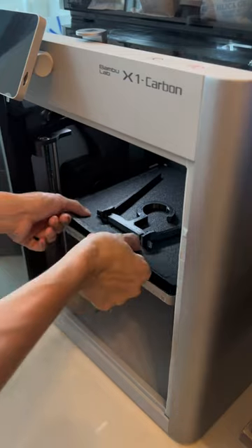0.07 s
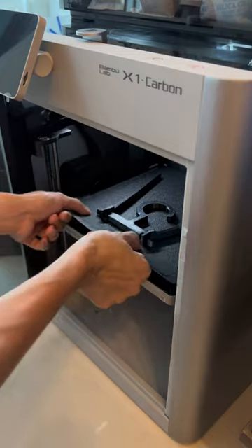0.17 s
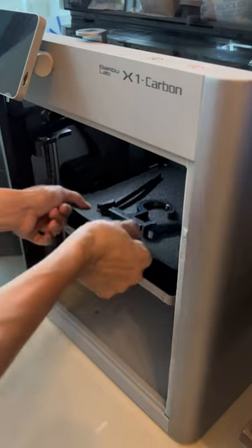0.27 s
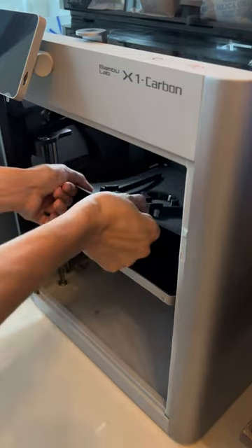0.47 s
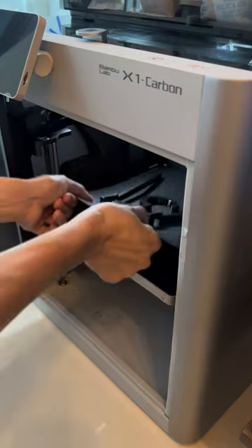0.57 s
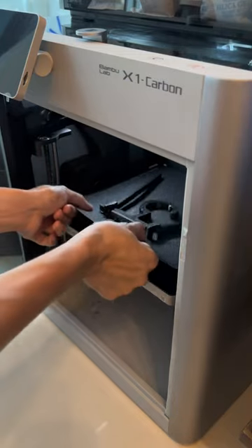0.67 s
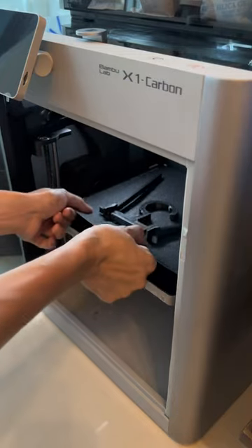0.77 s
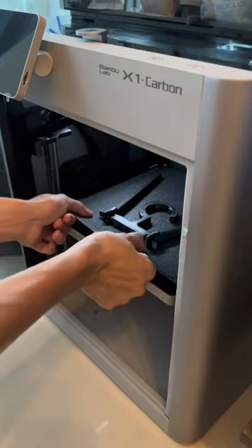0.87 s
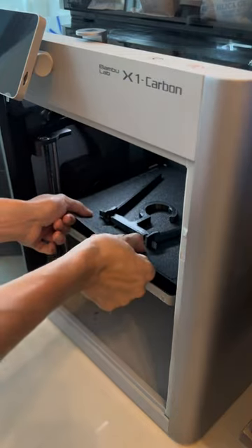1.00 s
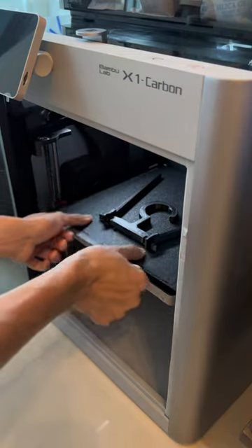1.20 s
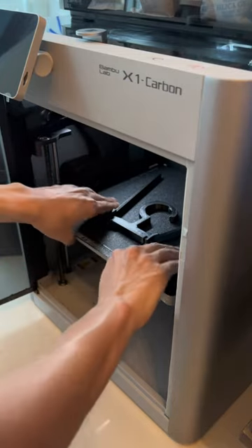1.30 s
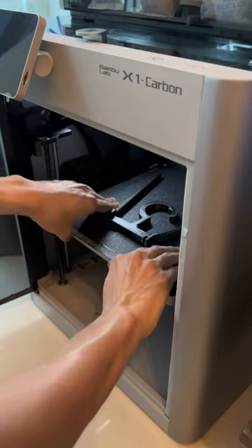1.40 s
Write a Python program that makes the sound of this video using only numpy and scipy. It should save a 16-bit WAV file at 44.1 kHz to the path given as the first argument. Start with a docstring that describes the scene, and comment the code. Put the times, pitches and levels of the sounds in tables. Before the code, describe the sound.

Sharp metallic clicks come from a steel plate being pulled loose and laid back in a machine cabinet: a ringing snap, a knock, a clack, faint scraping and a final click. The microphone is close, in a small hard room.

```python
"""Inside a machine cabinet in a small hard room, two hands work a spring-steel plate off its magnetic
bed and lay it back. The plate ticks, snaps free, knocks the frame, clacks down, then slides and clicks
home. Each contact is a burst of tiny impacts that makes the steel ring and the cabinet boom; sliding
makes a grainy hiss. The room echoes over air noise, hum and handling rumble. Heard by a phone close by.
"""
import sys
import numpy as np
from scipy import signal
from scipy.fft import rfft, irfft, next_fast_len
from scipy.io import wavfile
from scipy.ndimage import uniform_filter1d

SR = 44100
rng = np.random.default_rng(int(sys.argv[2]) if len(sys.argv) > 2 else 0)


def inscribe(sig):
    """Save sig as 16-bit PCM at rate SR to the path in sys.argv[1].

    A 1-D sig is mono; a 2-D sig holds one channel per row.
    Samples are clipped to [-1, 1] before scaling.
    """
    pcm = np.round(np.clip(np.atleast_2d(sig).T, -1, 1) * 32767)
    wavfile.write(sys.argv[1], SR, pcm.astype(np.int16))


N = 63945
BANDS = 25 * 2 ** (np.arange(29) / 3)  # pitches in Hz, three to an octave


# The snap. Each row: start in seconds, level in dB, cabinet boom in dB.
SNAPS = [(0.2346, 0, -28.5)]
# The tone of its crack. Each row: pitch in Hz, level in dB in an octave around that pitch.
SNAP_CRACK = [(100, -35), (190, -26), (330, -32), (650, -31.5), (1100, -21.5), (2700, -15.5), (4600, -16),
              (7000, -22.5), (9000, -30), (15500, -23)]
# The freed plate's notes. Each row: pitch in Hz, relative level in dB, seconds to fade by 60 dB.
SNAP_MODES = [(765, 10, .2), (1110, 2, .06), (1414, 0, .08), (1740, -2, .05), (2010, -1, .06),
              (2275, 2, .06), (2660, -1, .05), (2910, 2, .04), (4135, -1, .04), (4643, 3, .04),
              (5210, -2, .035), (5535, -1, .04), (6290, 0, .03), (7650, -1, .03)]

def snap_free():
    """The plate breaks from the magnet's pull and rings."""
    return contacts(SNAPS, SNAP_CRACK, SNAP_MODES,
                    ring_db=3, rise=.00092, hold=.0027, t60=.049, lag=.00258)


# The ticks. Each row: start in seconds, level in dB, cabinet boom in dB.
EDGE_TICKS = [(0.0655, -16.5, -90), (0.1225, 0.5, -68), (0.2349, 8, -75), (0.547, -47, -48.5),
              (0.626, -42, -63), (0.682, -54, -58.5), (0.950, -49, -70), (1.1135, -49, -60),
              (1.160, -25, -48.5), (1.2128, -13.5, -42.5)]
# Their tone. Each row: pitch in Hz, level in dB in an octave.
TICK_CRACK = [(300, -64.5), (1100, -64.5), (2000, -37.5), (3100, -32.5), (4900, -38), (6600, -29),
              (9500, -33.5), (15500, -27.5)]
# The held plate's notes. Each row: pitch in Hz, relative level in dB, fade time in seconds.
TICK_MODES = [(2140, -2, .04), (2930, 0, .04), (3690, -4, .04), (4160, -4, .035), (6280, -1, .025),
              (6700, 2, .03), (8510, -4, .015)]

def edge_ticks():
    """The plate's edge touches down with short, bright ticks."""
    return contacts(EDGE_TICKS, TICK_CRACK, TICK_MODES,
                    ring_db=9, rise=.0005, hold=.001, t60=.042, lag=.00089)


# The knocks. Each row: start in seconds, level in dB, cabinet boom in dB.
KNOCKS = [(0.2495, 3, -42), (0.4890, -1.5, -44.5)]
# Their tone. Each row: pitch in Hz, level in dB in an octave.
KNOCK_CRACK = [(150, -46), (400, -43), (900, -34), (1700, -38), (2400, -46), (4500, -50.5), (9000, -55.5),
               (15500, -66.5)]
# The frame's notes. Each row: pitch in Hz, relative level in dB, fade time in seconds.
FRAME_MODES = [(355, -2, .1), (595, -2, .08), (918, 2, .06), (1125, -4, .07), (1700, -1, .05),
               (1950, -2, .05)]

def frame_knocks():
    """The plate bumps the frame, which answers with lower notes."""
    return contacts(KNOCKS, KNOCK_CRACK, FRAME_MODES,
                    ring_db=6.5, rise=.0007, hold=.0045, t60=.11, lag=.001)


# The clacks. Each row: start in seconds, level in dB, cabinet boom in dB.
CLACKS = [(0.7470, -29, -81), (0.8594, 2.5, -46), (0.8765, -6, -52), (1.1860, -14, -46)]
# Their tone. Each row: pitch in Hz, level in dB in an octave.
CLACK_CRACK = [(200, -54), (700, -59), (1500, -42.5), (2400, -41), (4500, -51), (7000, -48.5),
               (10000, -51.5), (15500, -58)]
# The landing plate's notes. Each row: pitch in Hz, relative level in dB, fade time in seconds.
CLACK_MODES = [(1098, -4, .06), (1530, 3, .06), (2140, 2, .06), (2487, -2, .045), (2875, -2, .045),
               (4380, -1, .035)]

def clack_down():
    """The plate lands on its bed and rings briefly."""
    return contacts(CLACKS, CLACK_CRACK, CLACK_MODES,
                    ring_db=5, rise=.0006, hold=.0036, t60=.023, lag=.002)


# The last click. Each row: start in seconds, level in dB, cabinet boom in dB.
CLICKS = [(1.2234, 0, -61)]
# Its tone. Each row: pitch in Hz, level in dB in an octave.
CLICK_CRACK = [(300, -62), (900, -50), (2400, -37), (4000, -35.5), (6000, -32), (9000, -32.5),
               (12000, -21.5), (15500, -37)]
# The seated plate's notes. Each row: pitch in Hz, relative level in dB, fade time in seconds.
CLICK_MODES = [(900, -3, .012), (1600, 0, .012), (2450, 2, .012), (3500, 1, .014), (4300, -1, .014),
               (5250, 0, .014), (6000, 1, .012)]

def click_home():
    """The plate clicks into place and its notes die almost at once."""
    return contacts(CLICKS, CLICK_CRACK, CLICK_MODES,
                    ring_db=12, rise=.00021, hold=.0042, t60=.0057, lag=.00087)


def contacts(rows, crack, modes, ring_db, rise, hold, t60, lag):
    """Each contact chatters into the plate's natural notes (modes) and shakes the cabinet."""
    ring_s = .6
    out, t = np.zeros((2, N)), np.arange(int(ring_s * SR)) / SR
    f = np.fft.rfftfreq(len(t), 1 / SR)
    plate = plate_response(f, crack, modes, ring_db, lag)
    for start, db, boom_db in rows:
        mid, side = rfft(chatter(t[:8192], rise, hold, t60), len(t)) * plate
        hit = irfft(ports(mid, side, f), len(t)) * (t < ring_s / 2)
        sound = undb(db) * hit + undb(boom_db) * cabinet_boom(t)
        i = int(start * SR)
        out[:, i:i + len(t)] += sound[:, :N - i]
    return out


def chatter(t, rise, hold, t60):
    """A burst of tiny impacts that rises, holds and fades; all three times are in seconds."""
    shape = onset(t, rise) * fade(np.maximum(t - hold, 0), t60)
    burst = rng.standard_normal((2, len(t))) * shape
    for _ in range(8):  # make all pitches equally strong, then restore the shape
        burst = irfft(np.exp(1j * np.angle(rfft(burst))), len(t))
        burst = burst * shape / np.sqrt(abs(uniform_filter1d(burst ** 2, size=90)) + 1e-16)
    return burst / np.sqrt(np.sum(burst ** 2, axis=1, keepdims=True))


def plate_response(f, crack, modes, ring_db, lag):
    """Notes stand out of a dense ring, more so with ring_db; slow bending waves bring the lows later."""
    notes = 1 + sum(undb(db + ring_db) / (1 + 2j * np.pi * (f - hz) * t60 / np.log(1000))
                    for hz, db, t60 in modes)
    nearby_power = uniform_filter1d(uniform_filter1d(abs(notes) ** 2, size=400), size=400)
    per_hz = SR * np.sqrt(.005 / np.log(2) * f ** 3) / (f ** 2 + 70 ** 2)  # also thins the deep bass
    tone = undb(at(crack, f)) * per_hz
    delay_cycles = lag * (2 * np.sqrt(1000 * f) - f / 4)
    return notes / np.sqrt(nearby_power) * tone * np.exp(-2j * np.pi * delay_cycles)


# The cabinet's deep notes. Each row: pitch in Hz, relative level in dB, fade time in seconds.
CABINET_MODES = [(115.25, -15, .9), (158.2, -6.5, 0.9), (187, -0.5, 0.35), (218, -6, 0.37), (235, -9, 1)]

def cabinet_boom(t):
    """The shaken cabinet rings low, each note a little different on the left and right."""
    boom = 0
    for hz, db, t60 in CABINET_MODES:
        phase, side_shift = rng.uniform(0, 2 * np.pi, 2)
        angle = 2 * np.pi * hz * t + phase
        boom = boom + undb(db) * fade(t, t60) * ports(np.sin(angle), np.sin(angle + side_shift), hz)
    return boom * onset(t, rise=.007)


# Rubbing as the plate is lifted, carried and seated. Each row: time in seconds, level in dB.
LIFT_RUB = [(0, -0.5), (0.04, -4.5), (0.05, -7.5), (0.11, -11.5), (0.205, -14.5), (0.222, -2), (0.236, 15)]
CARRY_RUB = [(0.49, -24), (0.515, -14), (0.56, -24), (0.62, -65), (0.87, -33), (0.89, -8), (0.935, -31),
             (0.96, -19.5), (0.99, -63)]
SEAT_RUB = [(1.04, -31.5), (1.109, -15.5), (1.116, -4), (1.15, -2.5), (1.19, -4), (1.222, -5.5)]
# The tone of the rubbing. Each row: pitch in Hz, level in dB in an octave.
LIFT_TONE = [(400, -62), (1200, -65.5), (2100, -49.5), (3500, -49.5), (5000, -53.5), (6500, -51),
             (10000, -56.5), (15500, -52.5)]
SEAT_TONE = [(250, -59.5), (500, -58.5), (1100, -58.5), (2200, -56), (4500, -56.5), (8000, -63.5),
             (15500, -74)]

def sliding():
    """The plate rubs on its way off the bed and back on."""
    return rub(LIFT_RUB, LIFT_TONE) + rub(CARRY_RUB, LIFT_TONE) + rub(SEAT_RUB, SEAT_TONE)


def rub(curve, tone, grains_per_s=2100, rough_db=3):
    """Steel slides on the textured bed: a hiss broken into fine grains."""
    t = np.arange(N) / SR
    when, db = np.array(curve).T
    level = undb(np.interp(t, when, db)) * (t >= when[0]) * (t <= when[-1])
    grains = np.interp(t * grains_per_s, np.arange(N), rng.standard_normal(N))
    rough = undb(rough_db * grains)
    hiss = sum(undb(at(tone, hz)) * noise for hz, noise in band_noises(N, side_db=-2.5) if hz > 200)
    return hiss * rough / np.sqrt(np.mean(rough ** 2)) * level


# How long the echo lasts. Each row: pitch in Hz, seconds to fade by 60 dB.
ECHO_FADE = [(150, .6), (600, .9), (2000, .82), (4000, .76), (8000, .72), (14000, .45)]
# How strong it is. Each row: pitch in Hz, level in dB.
ECHO_LEVEL = [(120, -12.5), (450, -8), (1000, -16), (2500, -13.5), (4500, -16), (8000, -19), (14000, -26.5)]

def room_echo(sound):
    """Hard walls throw back a blur of echoes that dies sooner in the treble."""
    t, echo = np.arange(SR) / SR, 0
    for hz, noise in band_noises(len(t), side_db=0):
        tail = noise * onset(t, rise=.004) * fade(t, at(ECHO_FADE, hz))
        band_share = hz * (2 ** (1 / 6) - 2 ** (-1 / 6)) / (SR / 2)
        energy = np.mean(np.sum(tail ** 2, axis=1))
        echo = echo + tail * undb(at(ECHO_LEVEL, hz)) * np.sqrt(band_share / energy)
    return signal.fftconvolve(sound.mean(axis=0, keepdims=True), echo, axes=1)[:, :N]


# Air noise and rumble. Each row: pitch in Hz, level in dB in an octave.
AIR_TONE = [(22, -57), (40, -67.5), (60, -49.5), (85, -56), (125, -51.5), (220, -62), (400, -69.5),
            (900, -71), (1500, -76), (2200, -72.5), (4000, -85.5), (8000, -91), (15500, -85)]
# The hum. Each row: pitch in Hz, level in dB.
HUM = [(60, -53), (113, -55)]
# How handling swells the bass. Each row: time in seconds, level change in dB.
HANDLING_SWELL = [(0, -4), (0.25, -2.5), (0.38, -0.5), (0.53, 0.5), (0.66, -1.5), (0.8, -6), (0.89, 0.5),
                  (1.0, -1), (1.11, 4.5), (1.2, 1), (1.26, -1), (1.44, -2)]

def background():
    """Steady air noise over a low, humming rumble that swells as the plate is handled."""
    t = np.arange(N) / SR
    swell = undb(np.interp(t, *np.array(HANDLING_SWELL).T))
    hum = sum(undb(db) * np.sqrt(2) * np.sin(2 * np.pi * (hz * t + rng.random())) for hz, db in HUM)
    air = sum(undb(at(AIR_TONE, hz)) * noise * (swell if hz < 150 else 1)
              for hz, noise in band_noises(N, side_db=0))
    return hum * swell + air


# Scattered sound that the two microphone openings do not share. Each row: pitch in Hz, level in dB.
UNSHARED = [(60, -25), (200, -18), (450, -5), (900, 1), (1350, -2), (1900, -9), (2800, 0), (4600, 0),
            (6500, -6), (9000, -12), (12000, -20), (15000, -12)]

def ports(mid, side, hz, side_db=-7.5):
    """Left and right from a shared (mid) and an unshared (side) part; the default suits direct sound."""
    width = undb(at(UNSHARED, hz) + side_db)
    return (mid + width * side * np.array([[1], [-1]])) / np.sqrt(1 + width * width)


def band_noises(size, side_db):
    """Stereo noise in slices a third of an octave wide, each with a power of one third."""
    n = next_fast_len(size)
    f = np.arange(n // 2 + 1) * SR / n
    white = rfft(rng.standard_normal((2, n)))
    for hz in BANDS:
        distance = np.minimum(abs(3 * np.log2(np.maximum(f, 1) / hz)), 1)
        band = irfft(white * np.cos(np.pi / 2 * distance), n)[:, :size]
        mid, side = band / np.sqrt(3 * np.mean(band ** 2, axis=1, keepdims=True))
        yield hz, ports(mid, side, hz, side_db)


def undb(db):
    """Turn decibels into a multiplier."""
    return 10 ** (np.asarray(db) / 20)


def at(table, hz):
    """Read between a table's rows at a pitch, with octaves evenly spaced."""
    pitches, values = np.array(table, float).T
    return np.interp(np.log(np.maximum(hz, 1)), np.log(pitches), values)


def fade(t, t60):
    """Die away by 60 dB every t60 seconds."""
    return np.exp(-np.log(1000) * t / t60)


def onset(t, rise):
    """Come in smoothly over about rise seconds."""
    return 1 - np.exp(-(t / rise) ** 2)


def scene():
    """All contacts and rubs, their echo, and the background."""
    plate = edge_ticks() + snap_free() + frame_knocks() + clack_down() + click_home() + sliding()
    hush_s = 1.2285  # here the handling sound and its echo break off
    hush = fade(np.maximum(np.arange(N) / SR - hush_s, 0), t60=.024)
    return (plate + room_echo(plate)) * hush + background()


# How far the left side trails the right. Each row: pitch in Hz, phase lag in radians.
LEFT_LAG = [(100, 0), (4600, 0), (6000, .5), (8000, 1.5), (10000, 2.6), (11300, 3.08), (13500, 3.2),
            (15000, 4.0), (16000, 4.5)]
# How much louder the left side is. Each row: pitch in Hz, level in dB.
LEFT_BOOST = [(60, 0), (130, 0.5), (240, 1.5), (450, 6), (650, 1), (1100, 2), (2200, -0.5), (4000, 0),
              (8000, 0.07)]

def record(dry):
    """The phone's two openings differ in level and drift out of step in the treble; the top is cut."""
    f, sides = np.arange(N + 1) * SR / (2 * N), np.array([[1], [-1]])
    response = np.exp(-.5j * at(LEFT_LAG, f) * sides) * undb(.5 * at(LEFT_BOOST, f) * sides)
    mirrored = np.hstack([dry, dry[:, ::-1]])  # avoids a click at the ends
    heard = irfft(rfft(mirrored) * response, 2 * N)[:, :N]
    top_cut = signal.ellip(8, .2, 80, 16000, fs=SR, output="sos")
    return signal.sosfilt(top_cut, heard)


dry = scene()
out = record(dry)
inscribe(out)
```